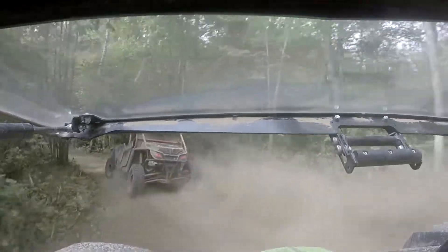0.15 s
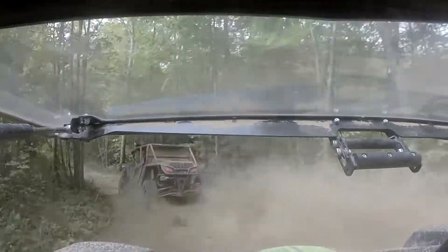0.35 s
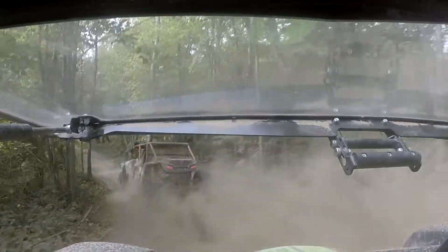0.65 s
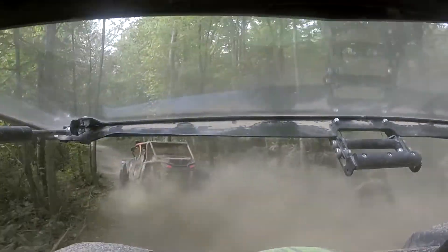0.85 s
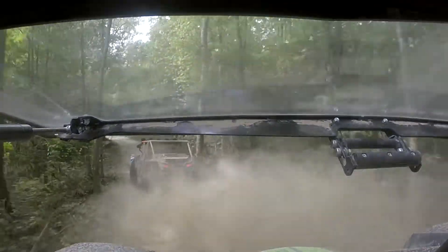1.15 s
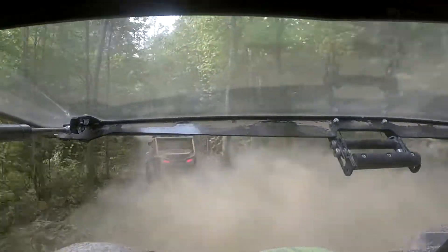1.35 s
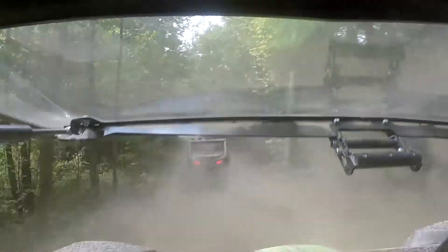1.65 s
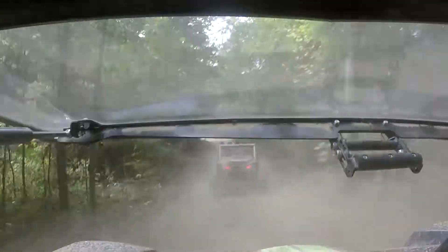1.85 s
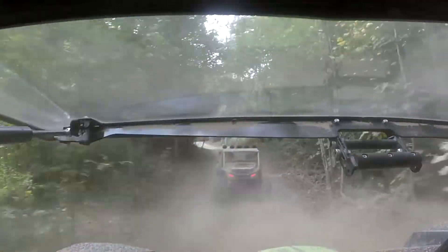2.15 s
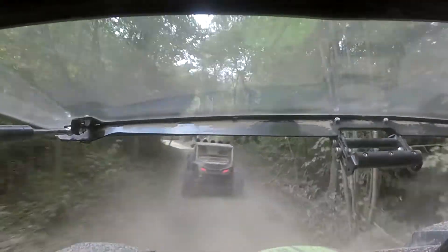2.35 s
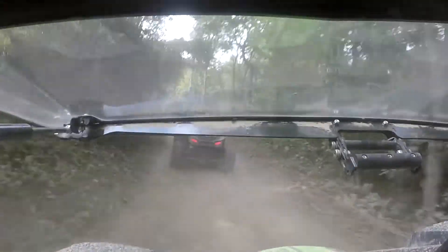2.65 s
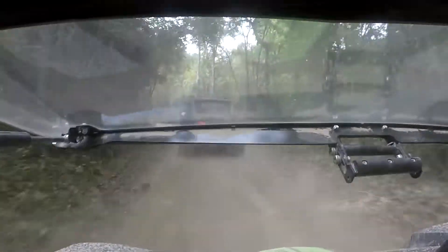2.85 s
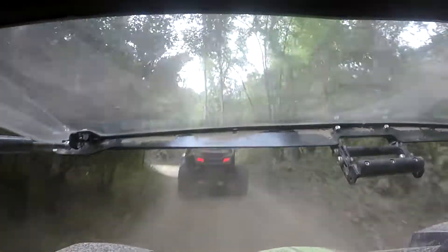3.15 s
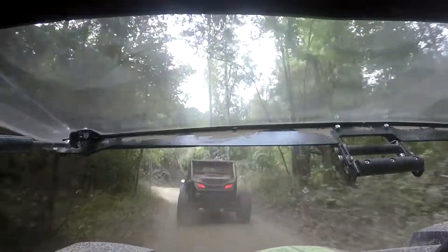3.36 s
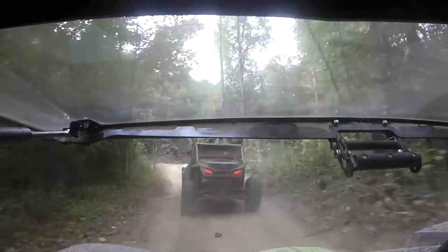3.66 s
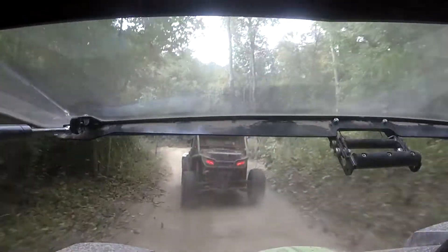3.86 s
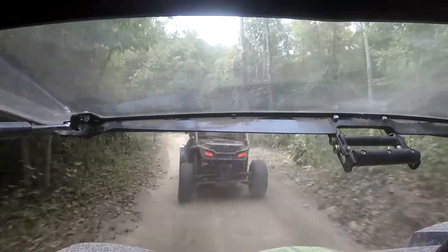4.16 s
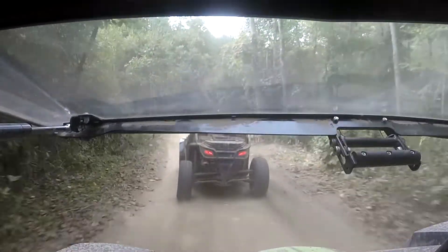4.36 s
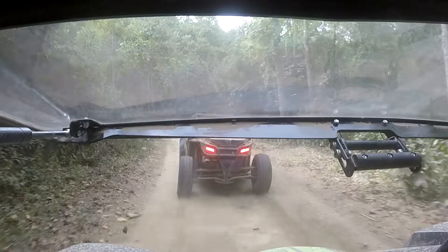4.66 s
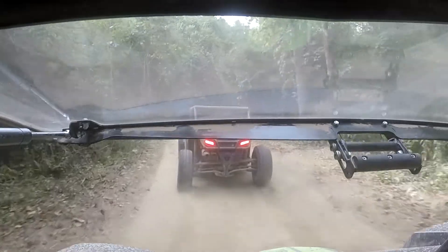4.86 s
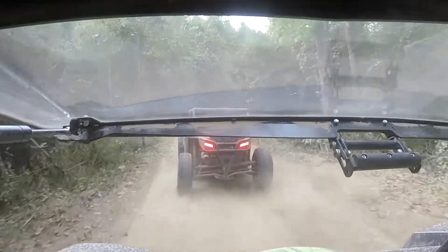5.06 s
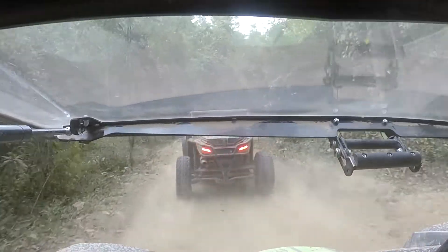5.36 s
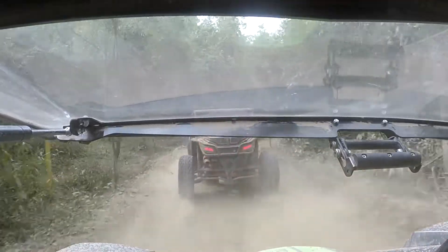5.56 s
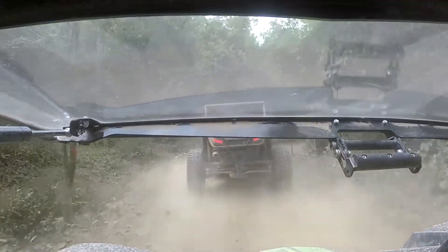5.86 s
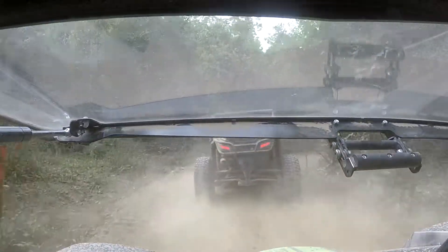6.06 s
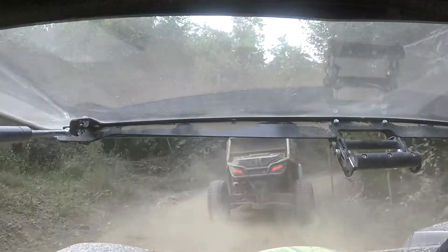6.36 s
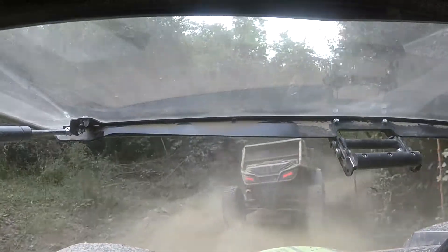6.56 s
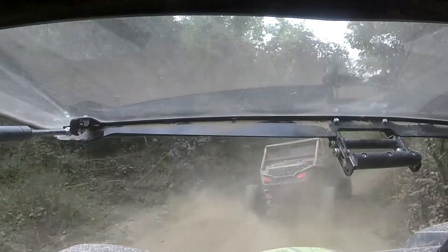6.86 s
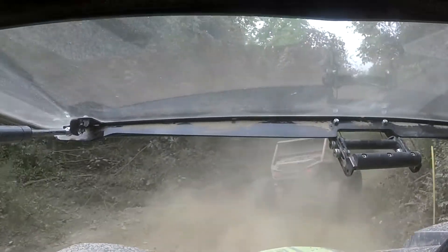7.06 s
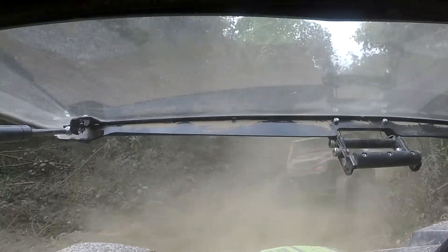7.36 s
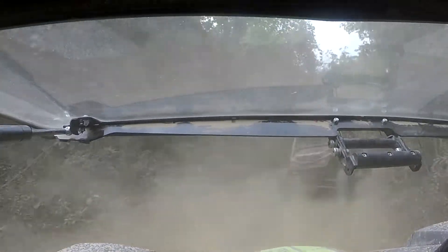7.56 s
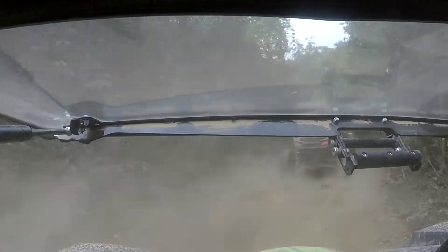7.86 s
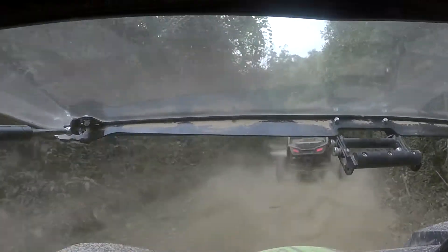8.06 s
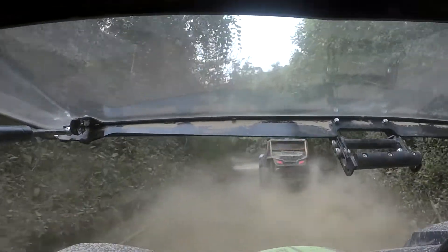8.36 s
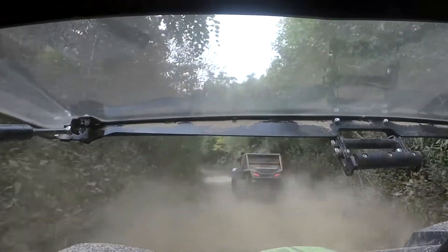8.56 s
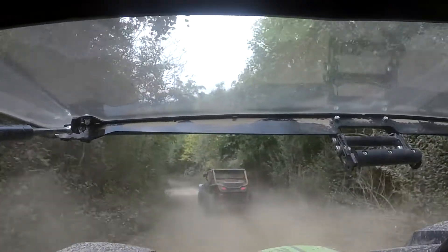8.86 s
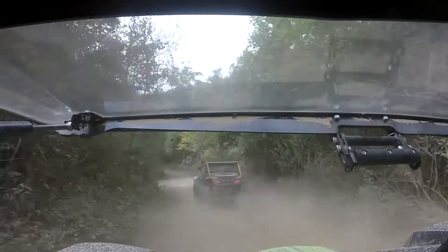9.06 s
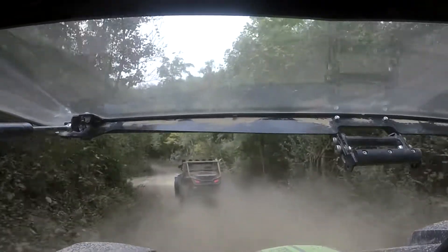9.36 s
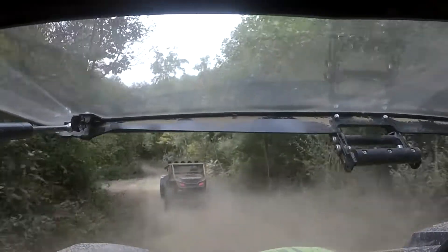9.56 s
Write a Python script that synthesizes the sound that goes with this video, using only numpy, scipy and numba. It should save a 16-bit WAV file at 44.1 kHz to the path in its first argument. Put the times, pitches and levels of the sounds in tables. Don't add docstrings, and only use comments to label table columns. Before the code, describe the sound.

A rough dirt-trail ride heard from a microphone in a hard case fixed to the buggy's frame. The engine growls up and down with the throttle while the cab booms deeply and roof and floor drum. Stones and suspension knock, plastic creaks, rubber groans, and loose parts tick and buzz at high revs. Another buggy's exhaust briefly comes through from ahead.

```python
import sys
import numpy as np
from scipy import signal
from scipy.io import wavfile
from scipy.ndimage import uniform_filter1d
from numba import njit

SR = 44100
rng = np.random.default_rng(int(sys.argv[2]) if len(sys.argv) > 2 else 0)


def store_wav(level_fs):
    pcm = np.round(np.clip(np.atleast_2d(level_fs), -1, 1) * 32767)
    wavfile.write(sys.argv[1], SR, pcm.T.astype(np.int16))


def amplitude_ratio(level_db):
    exponent = np.asarray(level_db, float) / 20
    return 10 ** exponent


N = 427769

# centre in Hz, width in Hz, level in dB.
CASE_HIGH = [(1649, 105, 4), (1781, 140, -5.5), (2249, 140, -4), (2660, 850, -4.5), (3360, 720, -14),
             (4600, 245, -14), (5670, 920, -21)]
# centre in Hz, width in Hz, level in dB.
FITTINGS = [(6450, 1300, -1), (8240, 800, -4.5), (10000, 1400, -6), (11800, 2000, -19),
            (13500, 1400, -11.5)]
# time in seconds, level in dB.
TRAIL = [(0, -24.5), (.5, -23.5), (.75, -18), (1.25, -21), (2, -31.5), (2.3, -29), (2.65, -21.5),
         (3.3, -26), (3.75, -18.5), (4, -24.5), (5, -21), (5.5, -22.5), (6.75, -27), (7.2, -24.5),
         (7.9, -26), (8.45, -21), (8.8, -28), (9.7, -28)]
# peak time in seconds, level in dB, fall time in seconds.
RUTS = [(.4, -28, 0.23), (.82, -20.5, .3), (1.0, -20, 0.21), (1.38, -25.5, 0.21), (2.85, -27.5, 0.22),
        (3.15, -22.5, 0.31), (3.43, -20.5, 0.075), (3.75, -25, 0.27), (4.25, -21, 0.21), (4.64, -18, .15),
        (4.87, -17.5, 0.048), (5.1, -24, .25), (5.35, -24.5, 0.28), (5.75, -34.5, .1), (6.13, -28.5, .1),
        (6.5, -23.5, 0.19), (7.06, -24, 0.32), (7.75, -27, 0.31), (8.1, -26, 0.21), (8.45, -22.5, .15)]
RUT_RISE_S, ROOF_REST_DB = 0.058, -32


def rows(table):
    s, *columns = np.transpose(table)
    return [np.interp(np.arange(N) / SR, s, c) for c in columns]


def unit(x):
    return x / np.sqrt(np.mean(x ** 2))


def span(s, length):
    return np.arange(int(s * SR), min(int((s + length) * SR), N))


def glide(hz0, hz1, waver):
    hz = np.linspace(hz0, hz1, len(waver)) * waver
    return np.sin(2 * np.pi * np.cumsum(hz) / SR)


@njit
def svf(x, hz, width):
    y, band, low = np.empty(len(x)), 0., 0.
    g, k = np.tan(np.pi * hz / SR), width / hz
    for i in range(len(x)):
        v = (band + g * (x[i] - low)) / (1 + g * (g + k))
        band, low = 2 * v - band, low + 2 * g * v
        y[i] = k * v
    return y


def walk(rate):
    k = int(SR / rate)
    steps = np.repeat(rng.standard_normal(N // 20)[:N // k + 2], k)
    slewed = uniform_filter1d(steps, k, mode="wrap")
    return 1.3 * uniform_filter1d(slewed, k, mode="wrap")[:N]


def ring(x, modes):
    out = 0
    for k, (hz, width, db) in enumerate(modes):
        mode = svf(svf(x, 1. * hz, 1.54 * width), 1. * hz, 1.54 * width)
        out = out + (-1) ** k * amplitude_ratio(db) * mode / np.sqrt(width)
    return out


def shaken(modes, drive, flicker_db, rate):
    out = 0
    for mode in modes:
        out = out + amplitude_ratio(flicker_db * walk(rate)) * ring(drive * rng.standard_normal(N), [mode])
    return unit(out)


def turns(hz, wobble):
    return np.cumsum(hz * (1 + wobble * walk(25))) / SR


def note(cycle, order, db, rough_db):
    level = np.sqrt(2) * amplitude_ratio(db + rough_db * walk(18))
    return level * np.cos(2 * np.pi * order * cycle - 0.5 * order)


def swells(events, rise_s, rest_db):
    t, power = np.arange(N) / SR, amplitude_ratio(2 * rest_db)
    for s, db, fall_s in events:
        drop_db = np.where(t < s, 9.7 * ((t - s) / rise_s) ** 2, 20 * (t - s) / max(fall_s, .02))
        power = power + amplitude_ratio(2 * db - drop_db)
    return np.sqrt(power)


def bursts(times, gains, lengths, rise):
    out, t = np.zeros(N + SR), np.arange(SR // 2) / SR
    noises = rng.standard_normal((len(times), len(t)))
    for s, g, length, noise in zip(times, gains, lengths, noises):
        envelope = np.exp(-t / length) * np.minimum(t / (rise * length), 1)
        out[int(s * SR):int(s * SR) + len(t)] += g * noise * envelope
    return out[:N]


def controls():
    # time in seconds, firing rate in Hz.
    speed = [(0, 102.1), (.7, 105.8), (1.3, 103.5), (1.82, 137.4), (2.52, 133.9), (3.1, 109.6),
             (3.4, 117.3), (3.75, 143.6), (4.3, 122.3), (6.45, 86.36), (7.58, 99.24), (7.95, 96.1),
             (8.32, 100.2), (8.63, 128.2), (8.8, 135), (9.03, 134.2), (9.25, 139.9), (9.45, 136.1)]
    # time in seconds, exhaust load in dB, driveline strain in dB.
    throttle = [(0, -21, -1.5), (1.12, -9, -1.5), (1.3, 0, -1.5), (1.55, -1.5, 1), (1.9, -5, -3),
                (2.54, -3, -3), (2.64, -25.5, -4), (3.03, -18.5, -7), (3.3, -5.5, 0), (3.6, -18, -2),
                (3.95, -8, -4), (4.3, -18.5, -5.5), (6.33, -21, -10.5), (6.85, -26.5, -4), (8.3, -19.5, -3),
                (8.55, -1.5, 0.5), (9.3, -2.5, -1), (9.7, -4.5, -2.5)]
    # time in seconds, swing of the firing rate in Hz, width in seconds.
    surges = [(.36, 2., 0.098), (.78, 1.5, 0.065), (.95, -1.5, 0.067), (1.12, 2, 0.085), (6.58, -4, .1),
              (6.85, 3.5, 0.19), (7.3, -0.54, .1), (7.7, -2, 0.053), (7.81, 0.88, 0.047),
              (8.13, -1.5, 0.087), (2.0, 1.07, 0.052), (2.3, -1.5, 0.054), (9.55, 0, 0.053)]
    inertia_s = 0.051
    t = np.arange(N) / SR
    swing = sum(rise * np.exp(-((t - s) / width) ** 2) for s, rise, width in surges)
    return [uniform_filter1d(rows(speed)[0], int(inertia_s * SR)) + swing, *rows(throttle)]


def exhaust(cycle):
    # frequency in Hz, level in dB.
    firing_tone = [(90, -3), (112, -38.5), (121, -17.5), (142, -13)]
    # frequency in Hz, level in dB.
    overtones = [(200, -34.5), (226, -18), (285, -16.5), (310, -21), (345, -33.5), (395, -23), (425, -28.5),
                 (520, -32.5)]
    # engine order, level in dB against the overtone curve.
    upper_orders = [(.5, -5), (1.5, -10), (2.5, -20), (3.5, -8.5), (4, -7), (4.5, -19.5), (5, -25)]
    hz, load_db, _ = controls()
    out = note(cycle, 1., load_db + np.interp(hz, *np.transpose(firing_tone)), 1.1)
    for order, rel_db, rough_db in [(2., 0, 1.1), (3., 0, 1.0), *((k, db, 2.6) for k, db in upper_orders)]:
        passed_db = np.interp(order * hz, *np.transpose(overtones))
        out += note(cycle, order, load_db + passed_db + rel_db, rough_db)
    return out


def block(cycle):
    # centre in Hz, width in Hz, level in dB.
    block_modes = [(380, 140, -4), (524, 170, -3.5), (855.3, 13, 1.5), (926, 36, 2.5), (1022, 47, 3.5),
                   (1064, 20, -4), (1209, 29, -3.5), (1360, 82, 3.5), (1630, 160, -13)]
    # order, best frequency in Hz, width in Hz, level in dB over the knock.
    teeth = [(4, 365, 45, -1), (8, 850, 22, -5), (9, 865, 25, -7), (9.5, 915, 45, -3), (12, 1175, 35, -8),
             (13.5, 1290, 30, -11), (14.5, 1370, 30, -9)]
    hz, _, strain_db = controls()
    knock_db = -30.5 + 2.2 * strain_db - 0.397 * (hz - 100)
    first = np.diff(np.floor(cycle / 2), prepend=0)
    second = np.diff(np.floor(cycle / 2 + .5), prepend=0)
    blows = (first + amplitude_ratio(-12) * second) * amplitude_ratio(0.5 * walk(50))
    knock = unit(ring(blows, block_modes)) + amplitude_ratio(-11.0) * shaken(block_modes[2:], 1, 1.1, 12)
    lope_db = 5.5 - 0.62 * np.maximum(hz - 103, 0)
    out = amplitude_ratio(knock_db) * knock + note(cycle, 1.5, knock_db + lope_db, 1.0)
    for k, best, width, db in teeth:
        out += note(cycle, k, knock_db + db - 6 * ((k * hz - best) / width) ** 2, 1.5)
    return out


def whine(cycle):
    # order, best frequency in Hz, width in Hz, level in dB at full load.
    mesh = [(7.5, 1010, 40, -38), (8, 1080, 40, -36), (10.5, 1410, 40, -44), (12, 1618, 45, -36)]
    hz, load_db, _ = controls()
    return sum(note(cycle, k, load_db - 4.2 + db - 6 * ((k * hz - best) / width) ** 2, 2.0)
               for k, best, width, db in mesh)


def ahead():
    # time in seconds, firing rate in Hz, level in dB.
    passages = [
        [(0, 130.4, -11), (.1, 136.4, -23.5), (.2, 145.3, -17), (.25, 146, -40)],
        [(4.7, 147.2, -30.5), (5, 145.6, -27.5), (5.3, 143.6, -29), (5.6, 131.1, -47), (5.9, 121.5, -44),
         (6.2, 122.7, -41), (6.5, 116.6, -52), (7, 104, -46)],
        [(7.2, 107.5, -25.5), (7.4, 117.5, -43), (7.55, 122, -18), (7.68, 123.5, -18), (7.77, 111.4, -55),
         (7.85, 125.9, -12.5), (7.96, 142.7, -18), (8.1, 149.8, -23), (8.27, 148.7, -25)],
    ]
    overtone_db = [-38.5, -40.5, -43.5]
    # order, level in dB over the overtone level.
    partials = [(.5, -8), (1.5, -9.5), (2, 5.5), (2.5, -10), (3, -7)]
    out, t = 0, np.arange(N) / SR
    for part, over_db in zip(passages, overtone_db):
        hz, db = rows(part)
        fade_in = np.clip((t - part[0][0] + .05) / .05, 0, 1)
        fade_out = np.clip((part[-1][0] + .05 - t) / .05, 0, 1)
        cycle = turns(hz, 0.00425)
        overtones = sum(note(cycle, k, over_db + rel_db, 2.2) for k, rel_db in partials)
        out = out + fade_in * fade_out * (note(cycle, 1., db, 1.8) + overtones)
    return out


def boom():
    # peak time in seconds, level in dB, fall time in seconds.
    bumps = [(.14, -12, 0.32), (.32, -10, 0.089), (.57, -12.5, 0.29), (.8, -15.5, 0.16), (1.16, -15, .15),
             (1.48, -11.5, 0.21), (1.62, -12.5, .1), (1.92, -14, 0.12), (2.26, -15, 0.066), (2.52, -14, .2),
             (2.75, -17.5, .15), (3.03, -19, .06), (3.23, -14.5, .05), (3.35, -13, 0.053),
             (3.52, -15.5, 0.41), (3.78, -14, .15), (3.97, -17.5, 0.14), (4.28, -10.5, 0.17),
             (4.5, -22, .15), (4.74, -22, .15), (5.2, -28, 0.33), (5.5, -19, .2), (5.72, -22.5, .07),
             (5.93, -23.5, 0.22), (6.27, -23, 0.32), (6.6, -21, .25), (6.98, -16, 0.13), (7.3, -25, 0.36),
             (7.56, -17, 0.31), (7.82, -18, .15), (8.2, -14, .04), (8.36, -11, .25), (8.75, -22, .15),
             (9.2, -26, .3), (9.42, -22, 0.21), (9.62, -11, .06)]
    swing = np.sqrt(2) * np.sin(2 * np.pi * turns(31.34, 0.054)) * amplitude_ratio(2.4 * walk(14))
    partner = unit(ring(rng.standard_normal(N), [(38.7, 6.3, 0)]))
    return swells(bumps, 0.041, -28.5) * (swing + amplitude_ratio(-7.0) * partner)


def drumming():
    # centre in Hz, width in Hz, level in dB.
    pan_modes = [(55.6, 7.5, 4), (75.9, 9, 3), (90, 40.6, 8.5), (115, 96, -5)]
    # centre in Hz, width in Hz, level in dB.
    roof_modes = [(145.8, 19, 4), (168.6, 25, 1)]
    # centre in Hz, width in Hz, level in dB.
    dash_modes = [(221, 22, -7.5), (236.3, 30, 2.5), (295.2, 16, -0.5), (344.5, 44, -5),
                  (391.6, 23.5, -2.5), (454, 44, -7.5)]
    # peak time in seconds, level in dB, fall time in seconds.
    thuds = [
        (.63, -25, .03),
        (1.16, -21.5, .03),
        (4.25, -27, .03),
        (4.53, -16.5, .04),
        (7.07, -14.5, .04),
        (7.62, -20, .03),
    ]
    hz, _, strain_db = controls()
    pan = np.hypot(amplitude_ratio(rows(TRAIL)[0]), swells(thuds, 0.02, -59)) * shaken(pan_modes, 1, 1.7, 10)
    roof = amplitude_ratio(-3.0) * swells(RUTS, RUT_RISE_S, ROOF_REST_DB) * shaken(roof_modes, 1, 1.0, 3.5)
    dash_db = -23.5 + 0.66 * strain_db + 0.0484 * (hz - 111.5)
    dash_db -= .3 * np.maximum(hz - 124, 0)
    return pan + roof + amplitude_ratio(dash_db) * shaken(dash_modes, 1, 1.63, 9)


def sway():
    roof, pan = (np.sqrt(2) * np.sin(2 * np.pi * turns(hz, .045)) * amplitude_ratio(2.0 * walk(14))
                 for hz in (146.5, 77.76))
    roof_level = amplitude_ratio(-1.5) * swells(RUTS, RUT_RISE_S, ROOF_REST_DB)
    return roof_level * roof + amplitude_ratio(rows(TRAIL)[0] - 5.5) * pan


def clatter(phase):
    # centre in Hz, width in Hz, level in dB.
    case_low = [(494, 89, -3.5), (598, 78, 1), (650, 20.2, -0.5), (816, 112, -5.5), (916, 72, -2.5),
                (1085, 105, -1), (1230, 160, -12), (1430, 230, -13)]
    # centre in Hz, width in Hz, level in dB.
    case_top = [(6300, 820, 3.5), (7250, 540, 0.5), (8140, 940, -0.5), (9300, 1600, -5.5),
                (10500, 1400, -15.5), (12200, 1500, -20.5), (13400, 1200, -19.5)]
    _, load_db, strain_db = controls()
    drive = (1 + 0.49 * np.exp(-phase / 0.4)) * amplitude_ratio(0.91 * walk(30) + 0.5 * walk(9))
    out = amplitude_ratio(-27 + 0.98 * strain_db) * shaken(case_low, drive, 0.93, 16)
    out += amplitude_ratio(-34 + strain_db) * shaken(CASE_HIGH, drive, 1.56, 35)
    out += amplitude_ratio(-40 + load_db) * shaken(CASE_HIGH[:1], drive, 1.3, 13)
    return out + amplitude_ratio(-58 + 0.87 * strain_db) * shaken(case_top, drive, 0.89, 23)


def squeaks():
    # start in seconds, length in seconds, start Hz, end Hz, level in dB.
    squeals = [(2.45, 0.032, 9754, 9704, -58), (3.128, 0.032, 6960, 6910, -43.5),
               (3.652, 0.067, 9300, 9500, -45.5), (9.185, 0.056, 9500, 9300, -50),
               (.003, .035, 2290, 2270, -41), (0.07, .03, 2240, 2230, -40), (.15, 0.05, 2160, 2120, -37),
               (2.636, .023, 2250, 2090, -40), (4.261, 0.049, 2390, 2280, -36),
               (4.468, 0.046, 2300, 2400, -33), (5.148, 0.067, 2250, 2230, -46),
               (5.302, .09, 2390, 2220, -39), (7.112, 0.027, 2270, 2250, -34),
               (7.892, 0.15, 2196, 2330, -40), (8.092, 0.19, 2304, 2360, -41)]
    # start in seconds, length in seconds, start Hz, level in dB.
    mounts = [(0.944, 0.028, 1080, -34), (3.148, 0.094, 1150, -30), (3.245, 0.16, 1410, -40),
              (3.258, 0.068, 1085, -23.5), (3.346, .099, 1230, -30.5), (3.51, 0.15, 1095, -30),
              (3.689, 0.077, 1142, -24.5), (3.751, 0.11, 1185, -26.5), (3.855, 0.066, 1090, -22),
              (4.218, 0.057, 1116, -28), (5.128, 0.11, 1124, -28), (5.401, 0.13, 1085, -29.5)]
    sag_hz_per_s = 370
    out, waver, rough = np.zeros(N), 1 + 0.0033 * walk(100), amplitude_ratio(2.1 * walk(120))
    grain = np.sqrt(2) * unit(ring(rng.standard_normal(N), [(70, 64, 0)]))
    groans = [(s, length, hz, hz - sag_hz_per_s * length, db) for s, length, hz, db in mounts]
    for s, length, hz0, hz1, db in [*squeals, *groans]:
        n = span(s, length)
        depth = .7 if 2000 < hz0 < 3000 else .3
        slip = .6 + depth * grain[n]
        out[n] += amplitude_ratio(db) * slip * np.hanning(len(n)) ** 0.44 * glide(hz0, hz1, waver[n])
    return out * rough


def hums():
    # start in seconds, length in seconds, start Hz, end Hz, level in dB.
    tones = [(0, 0.051, 394, 400, -24), (0.225, 0.12, 294, 323, -26), (0.345, 0.49, 632, 655, -33.5),
             (0.438, .12, 370, 380, -26), (0.681, 0.19, 393.4, 378, -34), (0.967, 0.11, 296, 310, -24.5),
             (1.04, 0.27, 650, 663, -33.5), (1.077, 0.21, 396.6, 400, -26.5), (2.777, 0.17, 300, 294, -27),
             (3.138, .28, 393.5, 409, -27), (3.437, .14, 303.6, 314, -26), (3.572, 0.19, 404, 392, -29.5),
             (4.251, 0.089, 284, 302, -25), (4.781, 0.35, 292, 290, -30.5), (5.281, 0.12, 392, 390, -33),
             (5.899, 0.54, 249.7, 223.7, -33), (7.0, 0.14, 240, 239, -28), (7.363, 0.17, 226.5, 239.4, -25),
             (7.453, 0.081, 391.7, 397.5, -28), (2.819, 0.015, 617, 640, -13),
             (2.816, 0.011, 1210, 1110, -21), (4.49, .016, 1160, 1100, -20.5),
             (8.74, 0.27, 1610, 1616, -34), (8.72, 0.29, 606, 611, -30), (9.24, .16, 554, 544, -31.5),
             (1.12, .16, 90, 96, -21), (2.66, 0.11, 214, 221, -27.5), (3.64, .12, 151.4, 144, -22),
             (4.859, 0.17, 398, 393, -32), (6.049, 0.27, 402, 400, -36.5), (2.904, 0.042, 630, 650, -23.5),
             (4.138, .024, 640, 620, -26.5), (4.261, 0.042, 650, 650, -16), (4.295, .025, 640, 625, -27),
             (4.491, 0.025, 610, 640, -14.5), (4.51, .065, 660, 650, -29), (7.116, 0.053, 650, 650, -25),
             (4.262, 0.015, 1136, 1110, -24), (7.845, 0.12, 296.8, 306.5, -24.5),
             (8.059, 0.28, 398, 402, -32)]
    out, waver = np.zeros(N), 1 + 0.0064 * walk(30)
    for s, length, hz0, hz1, db in tones:
        n = span(s, length)
        out[n] += amplitude_ratio(db) * np.sqrt(2 * np.hanning(len(n))) * glide(hz0, hz1, waver[n])
    return out * amplitude_ratio(2.0 * walk(25))


def fits():
    # start in seconds, length in seconds, level in dB.
    spells = [(0.996, 0.27, -63.5), (1.79, .05, -64), (1.893, 0.095, -59), (2.0, 0.018, -63),
              (2.036, 0.065, -58.5), (2.107, .03, -59), (2.17, 0.14, -55.5), (2.311, 0.029, -55),
              (2.357, 0.056, -61.5), (2.454, 0.04, -58.5), (2.488, 0.033, -53.5), (2.53, 0.035, -64),
              (2.594, 0.019, -65), (2.72, 0.062, -62), (2.874, 0.029, -59), (4.53, .05, -51),
              (7.637, 0.083, -62), (8.854, 0.14, -61), (8.982, 0.063, -54.5), (9.076, .03, -59),
              (9.11, 0.032, -56), (9.158, 0.066, -55), (9.29, 0.046, -56.5), (9.35, 0.088, -59.5),
              (9.463, .03, -56.5), (9.521, .03, -61), (9.57, .035, -61), (9.614, 0.05, -62)]
    out = np.zeros(N)
    for s, length, db in spells:
        n = span(s, length)
        out[n] += amplitude_ratio(db) * np.hanning(len(n)) ** 0.4
    return out


def buzz(phase):
    load_db = controls()[1]
    gate = .3 + np.exp(-((phase - .5) / 0.055) ** 2)
    chatter = gate * amplitude_ratio(3.2 * walk(120)) * rng.standard_normal(N)
    rattle = unit(ring(chatter, FITTINGS)) + amplitude_ratio(5.0) * unit(ring(chatter, CASE_HIGH[4:]))
    return rattle * (amplitude_ratio(-67 + 2.1 * load_db) + fits())


def knocks():
    # time in seconds, peak level in dB, bright part in dB, length in seconds.
    blows = [(0.405, -21.5, -20.5, 0.018), (1.148, -9.5, -14, 0.0074), (2.816, -3.5, -8.5, 0.0093),
             (2.84, -10, -22, 0.0081), (2.882, -13, -28, .008), (2.905, -11, -27, 0.02),
             (3.016, -14.5, -22.5, 0.014), (3.611, -12.5, -30, 0.011), (4.12, -15, -30, 0.004),
             (4.143, -21, -28, 0.011), (4.265, -11.5, -28, 0.025), (4.488, -6.5, -16, 0.011),
             (4.507, -9, -19, 0.01), (4.532, -22, -33, 0.025), (4.719, -27, -25, 0.017),
             (5.97, -22, -33, 0.0047), (6.592, -18, -28, 0.049), (7.119, -16.5, -26, 0.02),
             (7.581, -17, -23, 0.012)]
    # centre in Hz, width in Hz, level in dB.
    frame_modes = [(289, 71, -0.5), (528, 140, -6.5), (640, 55, -1), (840, 120, -8.5), (1090, 250, -12),
                   (1190, 690, -10), (1110, 620, -7.5)]
    s, db, bright_db, length = np.transpose(blows)
    length = np.clip(length, .003, .04)
    tail = bursts(s, amplitude_ratio(db - 18), 3.7 * length, 0.56)
    dull = ring(bursts(s, amplitude_ratio(db), length, 0.56) + tail, frame_modes)
    bright = ring(bursts(s, amplitude_ratio(bright_db), 0.7 * length, 0.5), CASE_HIGH[:2])
    low_pass = signal.butter(N=4, Wn=2300, fs=SR, output="sos")
    return signal.sosfilt(low_pass, amplitude_ratio(38) * dull + amplitude_ratio(36.5) * bright)


def ticks():
    # time in seconds, peak level in dB.
    taps = [(1.1857, -49), (1.272, -40.5), (1.802, -44), (1.8138, -44), (1.8786, -47), (1.947, -40.5),
            (2.0497, -45), (2.1061, -49), (2.1886, -42.5), (2.2525, -43), (2.3116, -46), (2.375, -40.5),
            (2.4006, -46), (2.4578, -47.5), (2.5024, -45), (2.5406, -44), (2.5691, -42.5), (2.598, -52),
            (2.7691, -47), (2.8788, -41.5), (2.9342, -52), (3.495, -41), (3.762, -49), (3.7773, -40),
            (3.895, -50), (3.9335, -53), (4.015, -44), (4.2832, -47), (4.3161, -42), (4.3505, -49),
            (4.5356, -47), (4.5622, -41), (4.6862, -46.5), (4.8968, -47), (5.3877, -43.5), (7.6897, -49),
            (8.3934, -47), (8.404, -45), (8.7903, -52), (8.822, -47), (8.861, -43), (8.9058, -40.5),
            (8.9514, -39.5), (8.9634, -41), (8.989, -41), (9.0249, -42), (9.0757, -41), (9.1122, -40.5),
            (9.184, -44), (9.2983, -44), (9.3452, -39.5), (9.3661, -46.5), (9.3816, -42), (9.474, -45),
            (9.579, -41.5), (9.638, -44), (9.661, -46)]
    s, db = np.transpose(taps)
    hits = bursts(s, amplitude_ratio(db), np.full(len(s), .0013), 2.5)
    out = amplitude_ratio(52.0) * ring(hits, FITTINGS) + amplitude_ratio(68) * ring(hits, CASE_HIGH[4:])
    return out + amplitude_ratio(56) * ring(hits, FITTINGS[3:])


def rasps():
    # start in seconds, length in seconds, level in dB.
    strokes = [
        (2.633, 0.16, -46),
        (2.795, 0.085, -40.5),
        (2.876, 0.086, -41),
        (3.08, 0.066, -43),
    ]
    # centre in Hz, width in Hz, level in dB.
    strap_modes = [(2190, 100, 0), (2360, 88, 0)]
    out = np.zeros(N)
    for s, length, db in strokes:
        n = span(s, length)
        out[n] += amplitude_ratio(db) * np.hanning(len(n)) ** 0.29
    return out * shaken(strap_modes, amplitude_ratio(2.1 * walk(150)), 1.2, 40)


def scene():
    cycle = turns(controls()[0], 0.002093)
    phase = cycle % 1
    out = exhaust(cycle) + block(cycle) + whine(cycle) + ahead()
    out += boom() + drumming() + sway() + clatter(phase)
    out += squeaks() + hums() + buzz(phase) + knocks() + ticks() + rasps()
    return out[None]


def roll_off(x):
    return signal.sosfilt(signal.butter(12, 15160, fs=SR, output="sos"), x)


def record(dry):
    edge = np.clip(np.minimum(np.arange(N), np.arange(N)[::-1]) / (.004 * SR), 0, 1)
    mix = np.tanh(0.91 * dry) / 0.86 * np.sin(np.pi / 2 * edge) ** 2
    return roll_off(mix)


dry = scene()
out = record(dry)
store_wav(out)
```